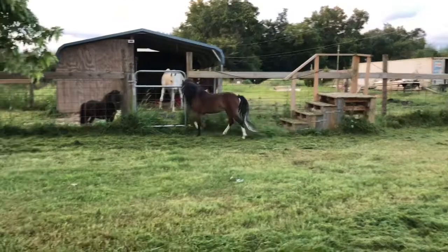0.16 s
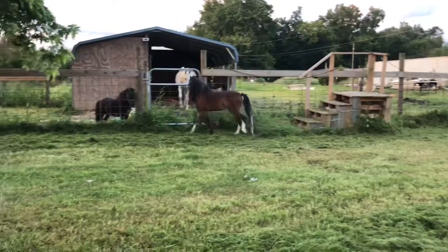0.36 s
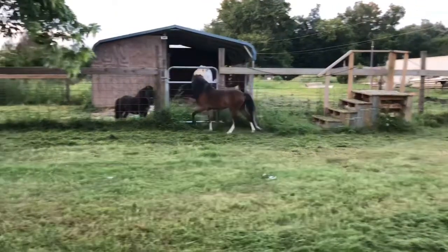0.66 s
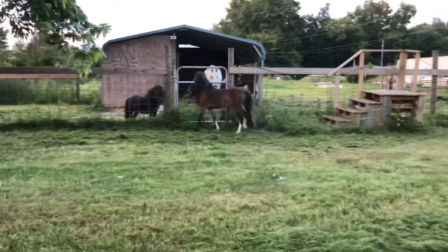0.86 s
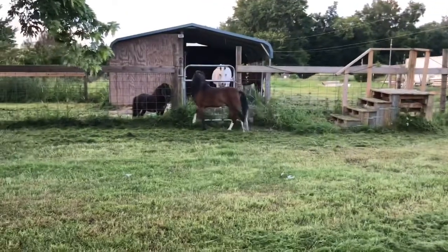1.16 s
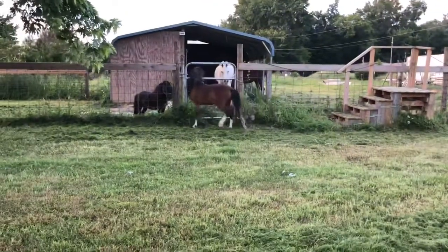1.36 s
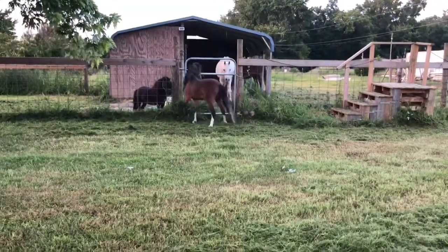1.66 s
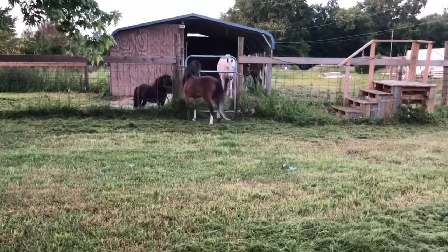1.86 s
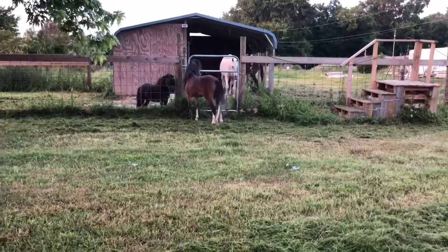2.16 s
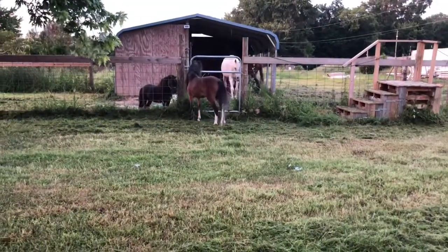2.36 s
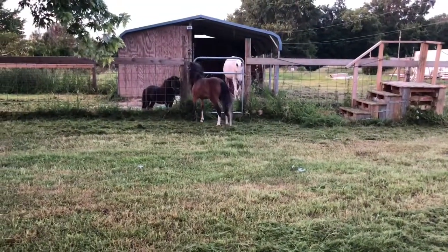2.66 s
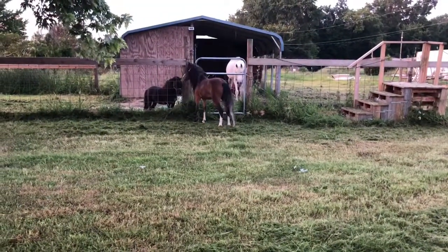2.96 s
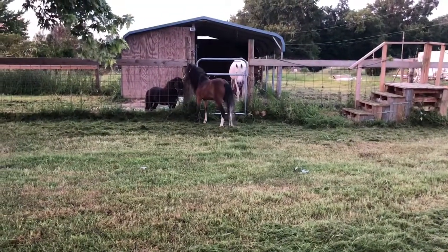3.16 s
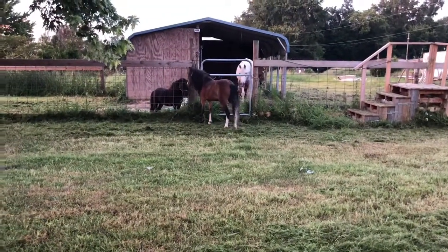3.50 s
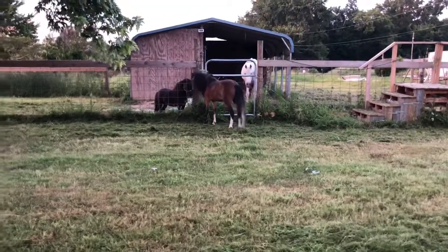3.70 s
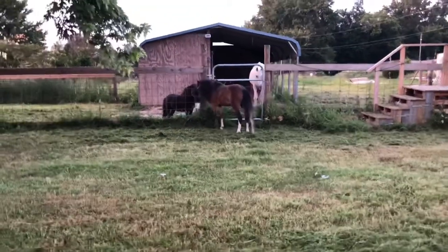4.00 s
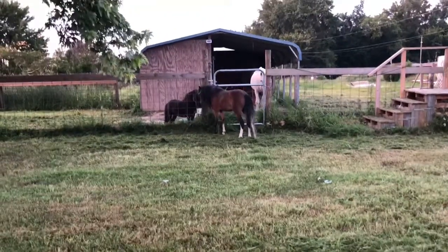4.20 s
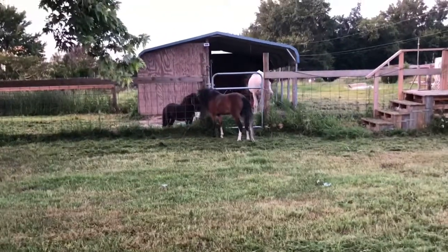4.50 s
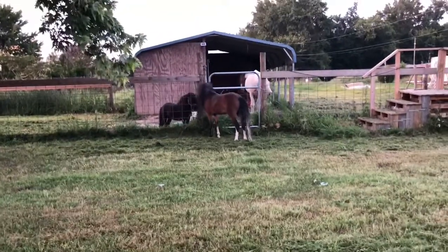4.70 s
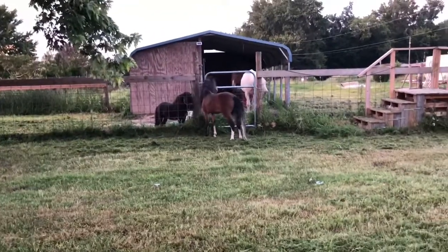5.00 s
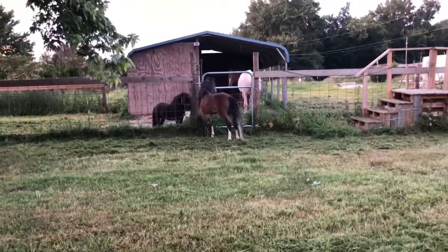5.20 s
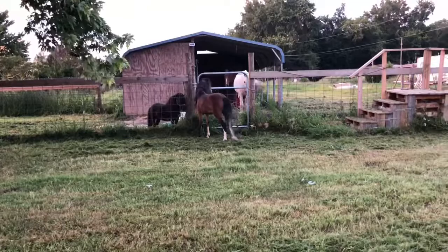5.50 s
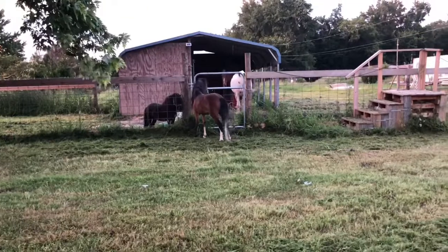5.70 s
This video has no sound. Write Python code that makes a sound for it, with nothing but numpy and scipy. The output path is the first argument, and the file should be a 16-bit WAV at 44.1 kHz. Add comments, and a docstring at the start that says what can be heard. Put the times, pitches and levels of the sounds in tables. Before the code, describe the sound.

High cricket chirps, each a quick run of tone pulses, dominate steadily with a distant chorus swelling at the same rate. Beneath lie soft grass hiss, insect drone and low road rumble, a vehicle passing faintly midway. Early soft blips, rustles and knocks, a hollow wall thud past the middle, and late hard ticks sound close. Open field, single microphone, mono.

```python
"""A grassy paddock at dusk: one cricket near, a lower one and a chorus farther off, all chirping three times a
second in tone pulses. Katydids rasp high above them in strokes of noise, over a far insect drone with faint
wavering trills, grass hiss and traffic on a far road, all shaped noise; one vehicle goes by. Close by fall soft
rising notes, knocks of click and falling thump, and ringing ticks; one hoof booms on a hollow shed wall, a sum
of modes. One microphone."""
import sys
import numpy as np
from scipy import signal
from scipy.fft import rfft, irfft, next_fast_len
from scipy.io import wavfile
from scipy.ndimage import uniform_filter1d, map_coordinates

SR = 44100
rng = np.random.default_rng(int(sys.argv[2]) if len(sys.argv) > 2 else 0)


def transcribe(u):
    """Save the signal u as a 16-bit wav file named by the first command-line argument.

    u: samples, shape (n,) or (channels, n), limited to [-1, 1]; the rate is SR.
    q: integer samples, one column per channel.
    """
    v = np.clip(np.atleast_2d(u).T, -1, 1)
    q = np.round(v * 32767).astype(np.int16)
    wavfile.write(sys.argv[1], SR, q)


def boost_factor(decibels):
    """Convert a level in decibels to a linear amplitude factor."""
    exponent = np.asarray(decibels, float) / 20
    return 10 ** exponent


N = 257984

# Chirps of the nearest cricket: first_pulse_s, pulses, level_db
NEAR_CHIRPS = [(0.002, 6, -42.5), (0.318, 5, -44), (0.619, 5, -44), (0.919, 5, -42.5), (1.226, 5, -41.5),
               (1.532, 5, -42.5), (1.863, 5, -42.5), (2.164, 5, -41), (2.46, 5, -42), (2.761, 5, -42),
               (3.057, 5, -43.5), (3.354, 5, -44), (3.644, 5, -40.5), (3.983, 5, -42), (4.279, 5, -42.5),
               (4.592, 5, -40.5), (4.908, 5, -41.5), (5.201, 4, -50), (5.457, 6, -43), (5.784, 3, -43)]
# Chirps of a lower cricket farther off: first_pulse_s, pulses, level_db
FAR_CHIRPS = [(-0.004, 7, -63), (0.314, 8, -56), (0.613, 8, -62), (0.935, 6, -60), (1.25, 6, -65),
              (1.516, 7, -47), (1.825, 8, -58), (2.136, 6, -54), (2.428, 6, -46.5), (2.719, 7, -48),
              (3.019, 8, -49), (3.368, 6, -52), (3.668, 5, -49), (3.939, 7, -60), (4.227, 7, -66),
              (4.51, 8, -54), (4.854, 6, -58), (5.167, 6, -53), (5.461, 7, -60), (5.758, 4, -59)]
# Swells of the far chorus: crest_s, level_db, loudest_pitch_hz
CHORUS_SWELLS = [(-0.2, -47, 6650), (0.11, -50, 6600), (0.41, -47.5, 6710), (0.73, -51, 6630),
                 (1.0, -48, 6630), (1.31, -48, 6630), (1.61, -51, 6660), (1.89, -49.5, 6640),
                 (2.21, -50, 6740), (2.51, -48.5, 6630), (2.82, -50.5, 6550), (3.12, -46.5, 6720),
                 (3.42, -48.5, 6620), (3.75, -48, 6590), (4.03, -48.5, 6630), (4.31, -46.5, 6670),
                 (4.61, -47, 6710), (4.93, -47.5, 6580), (5.23, -50, 6620), (5.521, -47, 6680),
                 (5.83, -48, 6650)]
SWELL_RISE_S, SWELL_FALL_S, SWELL_POINTED, STRAGGLERS_DB = .15, .16, 2.14, -65
# Course of the first katydid: time_s, strokes_ahead of the mean beat, level_db
FIRST_KATYDID = [(0, 0.19, -60), (0.15, 0.19, -58), (0.3, -0.15, -65), (0.47, -0.16, -69),
                 (0.56, -0.85, -80), (0.7, 0.07, -63), (0.88, 0.37, -59), (1.5, 0.74, -59),
                 (2.1, 0.95, -61.5), (2.75, 0.93, -58), (4.2, 0.037, -61), (4.55, -0.7, -57.5),
                 (4.64, -0.64, -65), (5, -0.21, -64), (5.25, -0.1, -61.5), (5.36, -0.57, -69),
                 (5.55, -0.85, -66), (5.85, -0.84, -65.5)]
# The second katydid swells once
SECOND_QUIET_DB, SECOND_LOUD_DB, SECOND_LOUD_S, SECOND_RISE_S, SECOND_FALL_S = -73, -61, 3.34, .4, .8
# Spectrum of the katydid rasp: frequency_hz, relative_db (per Hz)
RASP_SPECTRUM = [(7000, -26), (9500, -12), (11700, -11), (12120, -5.5), (12500, -11.5), (13700, -5),
                 (14300, -1), (14900, -3.5), (15700, 2.5)]
# Spectrum of the traffic rumble: frequency_hz, relative_db (per Hz)
RUMBLE_SPECTRUM = [(15, -63), (25, -37), (30, -48), (43, -6), (113, 1), (172, -5), (198, -7), (224, -11.5),
                   (305, -16.5), (539, -16.5), (639, -18.5), (723, -19.5), (1000, -20), (1300, -26.5),
                   (2200, -120)]
# Spectrum of the passing tyres: frequency_hz, relative_db (per Hz)
TYRE_SPECTRUM = [(410, -20), (700, -9.5), (826, -7), (961, -18.5), (1300, 2.5), (1770, -6), (2100, -11),
                 (2730, -28), (4620, -120)]
# A vehicle goes by: time and level at its closest, distance to the road, speed
PASS_S, PASS_DB, ROAD_M, SPEED_M_PER_S = 3.29, -60, 20.3, 30.3
RUMBLE_DB, DRONE_DB = -55.5, -52.5
# Spectrum of the far insect drone: frequency_hz, relative_db (per Hz)
DRONE_SPECTRUM = [(1120, -38), (1900, -16), (2150, -4), (2400, -8), (2950, 2), (4160, -3.5), (4920, 0.5),
                  (6280, -4), (6810, -4.5), (7130, -4), (7600, -25), (9880, -66), (16700, -120)]
# Spectrum of the grass hiss: frequency_hz, relative_db (per Hz)
GRASS_SPECTRUM = [(500, -7.5), (2000, -3.5), (7500, -2), (12000, -7.5), (15800, -2.5)]
# Level of the grass hiss: time_s, level_db
GRASS_LEVEL = [(0.0, -62), (0.39, -70), (0.58, -61), (1.71, -63.5), (2.2, -56), (3.27, -56), (4.1, -61),
               (4.58, -62.5), (4.71, -63.5), (5.85, -60.5)]
# Short rustles in the grass: start_s, level_db, t60_s
GRASS_RUSTLES = [(0.1336, -55, 0.072), (0.5894, -48, 0.08), (1.2194, -52, 0.13), (2.0383, -51, 0.14)]
# Faint wavering trills far away, which come and go: pitch_hz, width_hz, level_db
FAR_TRILLS = [(1116, 38, -76), (1600, 77, -75.5), (2278, 33, -77.5), (2700, 30, -72.5), (3000, 54, -67),
              (4025, 29, -69), (4470, 27, -79), (4884, 19, -72)]
# Soft rising notes close by: start_s, level_db, from_hz, to_hz, length_s
RISING_NOTES = [(0.479, -49, 250, 297, 0.011), (0.527, -46, 380, 650, 0.0275),
                (1.124, -53.5, 593, 650, 0.029), (1.139, -48, 348, 635, 0.034)]
# Close knocks: start_s, click_db, dull_db (per octave, negative is brighter), thump_db, thump_hz, thump_s
CLOSE_KNOCKS = [(0.5731, -35, -4.5, -31.5, 296, 0.011), (1.187, -28, 0, -32, 305, 0.022),
                (3.396, -70, 0, -25.5, 326, 0.025), (5.288, -42, -6.5, -33.5, 543, 0.0041),
                (5.295, -47, -1, -53, 250, 0.013)]
# Modes that ring in a click: pitch_hz, relative_db, t60_s
CLICK_MODES = [(1056, 10, 0.008), (1510, 0, 0.0057), (2060, 9, 0.0052), (2960, -0.5, 0.013),
               (3520, 3, 0.0069), (4370, 0.5, 0.0065), (6600, 0, .005), (9650, -8, 0.0035)]
# Close hard ticks: start_s, level_db, pitch_hz
HARD_TICKS = [(1.09, -42, 2150), (1.219, -39, 790), (1.224, -40, 2280), (1.232, -43, 1640),
              (1.397, -44.5, 577), (5.114, -38.5, 1840), (5.462, -38.5, 2370), (5.643, -36.5, 2380),
              (5.818, -36.5, 2200)]
# Modes of the hollow shed wall: pitch_hz, relative_db, t60_s
WALL_MODES = [(110.9, -8.5, 0.92), (148, -9, 0.28), (192.3, -12, 0.63), (230, -11, 0.29), (288, -13, 0.33),
              (329, -9, 0.22), (392, -13.5, 0.15), (437, -10, 0.15), (504, -24, 0.13)]
TOP_HZ = 15740  # band limit of the recorder


def unit(x):
    """Scaled to rms 1."""
    return x / np.sqrt(np.mean(x ** 2) + 1e-20)


def curves(rows):
    """One value per sample for each column after the time."""
    s, *columns = np.transpose(rows)
    return [np.interp(np.arange(N) / SR, s, column) for column in columns]


def wobble(rate):
    """A smooth random curve, rate knots a second."""
    knots = rng.standard_normal(int(N * rate / SR) + 4)
    return map_coordinates(knots, [np.arange(N) * rate / SR])


def filtered(x, response):
    """x times a response of frequency."""
    size = next_fast_len(N + 8192)
    return irfft(rfft(x, size) * response(np.fft.rfftfreq(size, 1 / SR)), size)[..., :N]


def rush(spectrum, patchy_db):
    """Noise of rms 1 with patches of random gain in time and pitch, silent outside its spectrum."""
    grains = signal.stft(rng.standard_normal(N), nperseg=512)[2]
    patches = uniform_filter1d(rng.standard_normal(grains.shape), size=5, axis=0)
    patches = uniform_filter1d(patches, size=12, axis=1)
    noise = signal.istft(grains * boost_factor(patchy_db * unit(patches)), nperseg=512)[1][:N]
    f, db = np.transpose(spectrum)

    def response(hz):
        return boost_factor(np.interp(np.log(hz + 1), np.log(f + 1), db, -120, -120))

    return unit(filtered(noise, response))


def add(track, s, sound):
    """Mixes a sound into the track at time s, or at the very start if s is negative."""
    part = track[max(round(s * SR), 0):][:len(sound)]
    part += sound[:len(part)]


def wing_pulse(hz, length, sag):
    """One wing stroke: a short tone that sags in pitch as the file runs out."""
    u = np.arange(round(length * SR)) / (length * SR)
    turns = hz * length * (u + sag * (u - u * u) / 2)
    swell = np.sin(np.pi * u ** 1.11) ** 0.78
    return swell * np.sin(2 * np.pi * (turns + rng.random()))


def cricket(chirps, hz, scatter_db):
    """Each chirp is a row of evenly spaced wing strokes of slightly scattered pitch and level."""
    out = np.zeros(N)
    for s, pulses, db in chirps:
        for k in range(round(pulses)):
            pitch = hz * (1 + rng.normal(0, .0012))
            pulse = wing_pulse(pitch, 0.019, sag=0.011)
            gain = boost_factor(db + rng.normal(0, scatter_db))
            add(out, s + k * .0273 - .009, gain * pulse)  # starts about half a pulse early
    return out * boost_factor(1.4 * wobble(170))  # uneven teeth roughen each stroke


def chorus(count):
    """Many far crickets of scattered pitch and beat swell together, now the higher and now the lower leading."""
    out, t = np.zeros(N), np.arange(N) / SR
    swell = boost_factor(STRAGGLERS_DB)
    for s, db, _ in CHORUS_SWELLS:
        u = np.clip(np.where(t < s, (s - t) / SWELL_RISE_S, (t - s) / SWELL_FALL_S), 0, 1)
        swell = swell + boost_factor(db) * np.abs(np.cos(np.pi * u / 2)) ** SWELL_POINTED
    _, lead_hz = curves(CHORUS_SWELLS)
    strokes_per_s = 36.6
    for hz in np.linspace(6400, 6870, count):
        for s in np.arange(rng.random(), N / SR * strokes_per_s - 1) / strokes_per_s:
            scatter_db = rng.normal(0, 2)
            off_lead = (hz - lead_hz[int(s * SR)]) / 240
            pulse = wing_pulse(hz + rng.normal(0, 21.8), .02, sag=0.016)
            add(out, s + rng.normal(0, .003), boost_factor(-8 * off_lead ** 2 + scatter_db) * pulse)
    return swell * unit(out)


def crickets():
    """All crickets with a decaying noise tail; grass and fences scatter the nearest one least."""
    near = cricket(NEAR_CHIRPS, 6907, 1.4)
    far = cricket(FAR_CHIRPS, 6510, 1.7) + chorus(count=16)
    t = np.arange(SR // 4) / SR
    tail = rng.standard_normal(len(t)) * boost_factor(-60 * t / .2)  # 0.2 s t60
    sent = boost_factor(-14.5) * near + boost_factor(-13) * far
    return near + far + signal.fftconvolve(sent, tail / np.linalg.norm(tail))[:N]


def katydids():
    """Each noise stroke swells slowly and stops short; the second insect strokes between those of the first."""
    t = np.arange(N) / SR
    ahead, first_db = curves(FIRST_KATYDID)
    late = t - SECOND_LOUD_S
    spread = np.where(late < 0, SECOND_RISE_S, SECOND_FALL_S)
    second_db = SECOND_QUIET_DB + (SECOND_LOUD_DB - SECOND_QUIET_DB) * np.exp(-(late / spread) ** 2 / 2)
    beat = 40.8 * t + ahead  # in strokes
    out = 0
    for db, shift in ((first_db, -.33), (second_db, .17)):
        u = (beat + shift) % 1
        stroke = 0.33 + u ** 1.7 * np.clip((1 - u) / 0.24, 0, 1)
        rasp = rush(RASP_SPECTRUM, patchy_db=1.2)
        out = out + boost_factor(db + 1.0 * wobble(25.06)) * unit(stroke * rasp)
    return out


def traffic():
    """Unsteady rumble of a far road; a passing vehicle's tyre noise grows as one over its distance."""
    rumble = boost_factor(RUMBLE_DB + 0.37 * wobble(3.13)) * rush(RUMBLE_SPECTRUM, patchy_db=1.44)
    along_m = SPEED_M_PER_S * (np.arange(N) / SR - PASS_S)
    near = ROAD_M / np.hypot(ROAD_M, along_m)
    return rumble + boost_factor(PASS_DB) * near * rush(TYRE_SPECTRUM, patchy_db=2.0)


def drone():
    """Far insects blend into one band of slightly patchy noise."""
    return boost_factor(DRONE_DB) * rush(DRONE_SPECTRUM, patchy_db=1.22)


def grass():
    """Grass hiss is broad noise that rises and falls, with short rustles that start fast and die away."""
    swish, t = boost_factor(curves(GRASS_LEVEL)[0]), np.arange(SR // 4) / SR
    for s, db, t60 in GRASS_RUSTLES:
        add(swish, s, boost_factor(db - 60 * t / t60) * (1 - np.exp(-t / .003)))
    return swish * rush(GRASS_SPECTRUM, patchy_db=2.0)


def trills():
    """Single far insects stand out of the drone as narrow wavering bands that come and go."""
    out = np.zeros(N)
    for hz, width, db in FAR_TRILLS:
        band = filtered(rng.standard_normal(N), lambda f: np.exp(-((f - hz) / width) ** 2))
        out += boost_factor(db + 3.3 * wobble(4.16)) * unit(band)
    return out


def rising_notes():
    """Soft unsteady notes whose pitch rises evenly, like a hoof leaving wet ground."""
    out, t = np.zeros(N), np.arange(SR // 30) / SR
    for s, db, from_hz, to_hz, length in RISING_NOTES:
        u = np.clip(t / length, 0, 1)
        turns = length * u * (from_hz + (to_hz - from_hz) * u / 2)
        gain = boost_factor(db + 2.5 * wobble(253)[:len(t)])
        add(out, s, gain * np.sin(np.pi * u) * np.sin(2 * np.pi * turns))
    return out


def click(t, dull_db):
    """A hard contact: a few short modes, fewer highs when dull, and a puff of noise."""
    ring = 0
    for hz, db, t60 in CLICK_MODES:
        ring = ring + boost_factor(db - dull_db * np.log2(hz / 1000) - 60 * t / t60) * np.sin(2 * np.pi * hz * t)
    puff = rng.standard_normal(len(t)) * boost_factor(-60 * t / 0.0063)
    return (.5 * ring + .5 * puff) * (1 - np.exp(-t / 0.00019))


def knocks():
    """A sharp click, then a thump whose pitch keeps falling as the contact softens."""
    out, t = np.zeros(N), np.arange(SR // 16) / SR
    for s, click_db, dull_db, thump_db, hz, length in CLOSE_KNOCKS:
        turns = hz * 0.01257 * (1 - np.exp(-t / 0.013))  # starts just under hz
        swell = np.sin(np.pi * np.clip(t / length, 0, 1) ** 0.41) ** 2.4
        add(out, s - .0005, boost_factor(click_db) * click(t, dull_db))
        add(out, s + 0.00237, boost_factor(thump_db) * swell * np.sin(2 * np.pi * turns))
    return out


def ticks():
    """Small hard ticks ring a few cycles in two modes, with a burst of noise."""
    out, t = np.zeros(N), np.arange(SR // 30) / SR
    for s, db, hz in HARD_TICKS:
        modes = np.sin(2 * np.pi * hz * t) + 0.32 * np.sin(2 * np.pi * .62 * hz * t)
        ring = boost_factor(-60 * t / 0.013) * (1 - np.exp(-t / 0.00016)) * modes
        burst = 0.56 * rng.standard_normal(len(t)) * boost_factor(-60 * t / 0.0078)
        add(out, s, boost_factor(db) * (ring + burst))
    return out


def wall(s, db):
    """The shed wall, struck by a hoof, hums on in its low modes, each blurred by loose boards."""
    out, t = np.zeros(N), np.arange(SR // 2) / SR
    ring = 0
    for hz, level, t60 in WALL_MODES:
        blur = boost_factor(2.7 * wobble(69)[:len(t)])
        ring = ring + blur * boost_factor(level - 60 * t / t60) * np.sin(2 * np.pi * (hz * t + rng.random()))
    add(out, s, boost_factor(db) * ring * (1 - np.exp(-t / 0.0064)))
    return out


def scene():
    """Everything reaches one microphone, which feeds both channels alike."""
    mono = crickets() + katydids() + traffic() + drone() + grass() + trills()
    mono = mono + rising_notes() + knocks() + ticks() + wall(3.408, db=-31)
    return np.array([mono, mono])


def top_cut(x):
    """Nothing passes above the cut-off."""
    return signal.sosfilt(signal.butter(12, 17030, fs=SR, output="sos"), x)


def record(dry):
    """The recorder keeps nothing above its band limit."""
    mix = filtered(dry, lambda hz: hz < TOP_HZ)
    return top_cut(mix)


dry = scene()
out = record(dry)
transcribe(out)
```